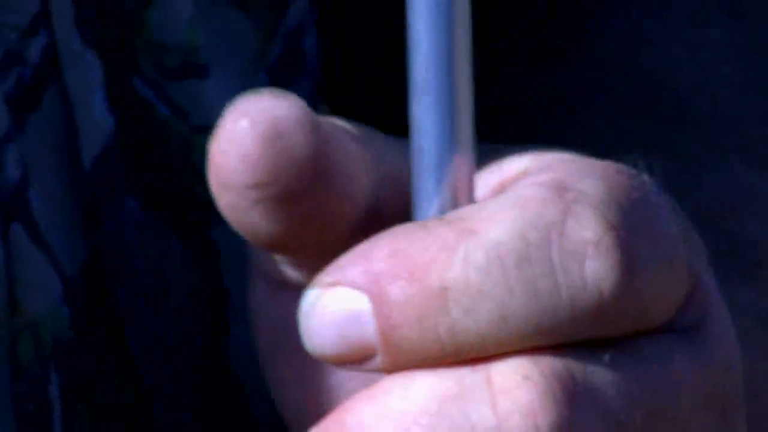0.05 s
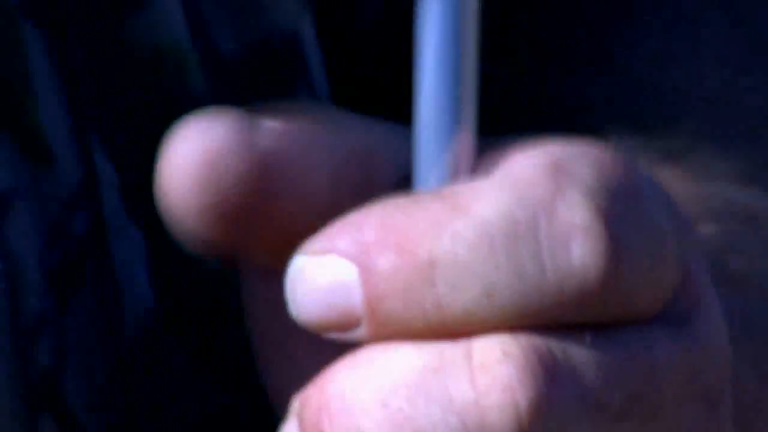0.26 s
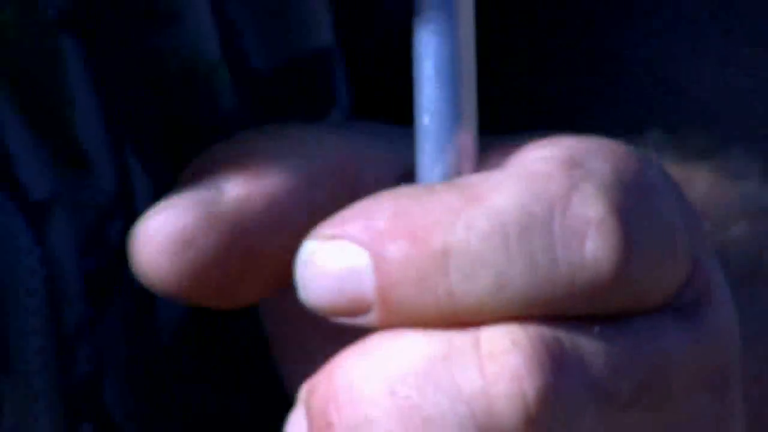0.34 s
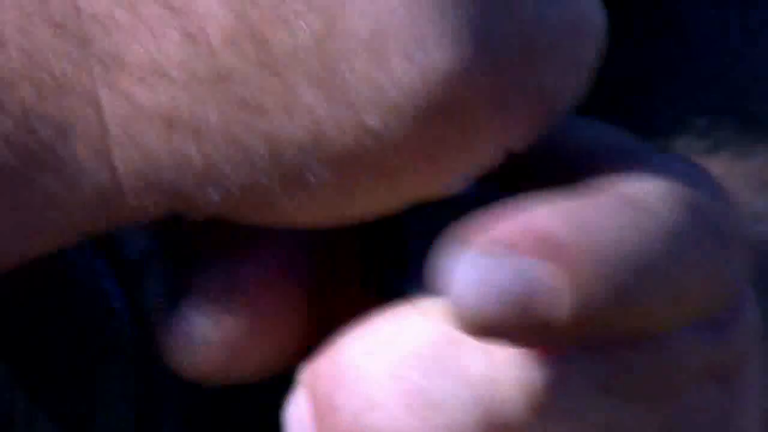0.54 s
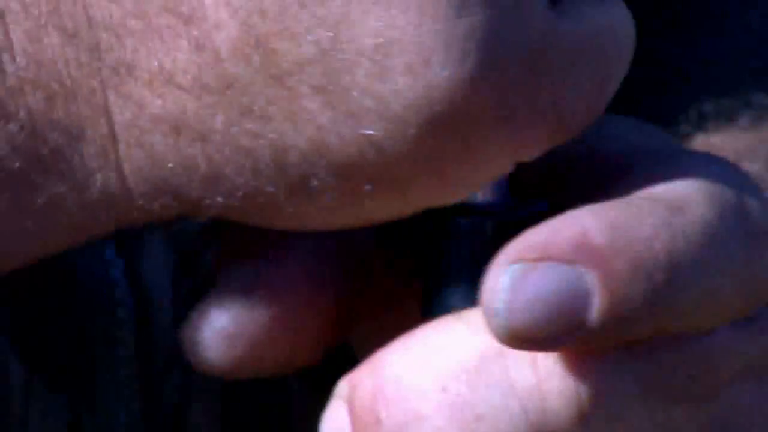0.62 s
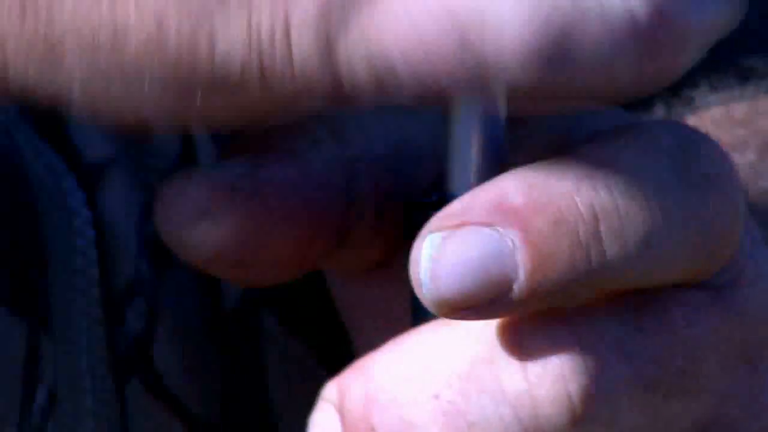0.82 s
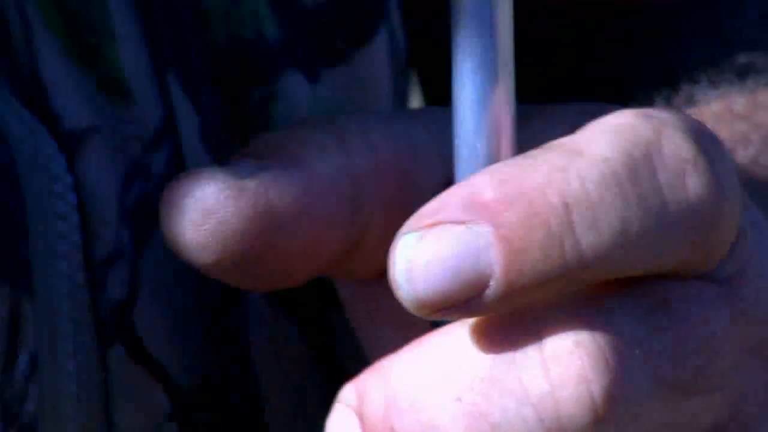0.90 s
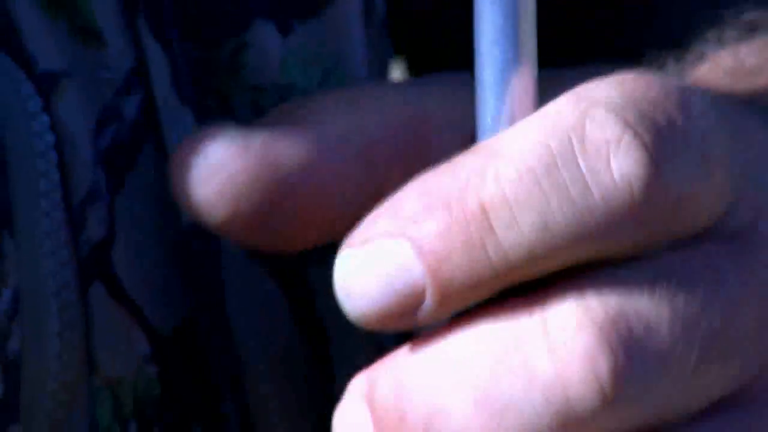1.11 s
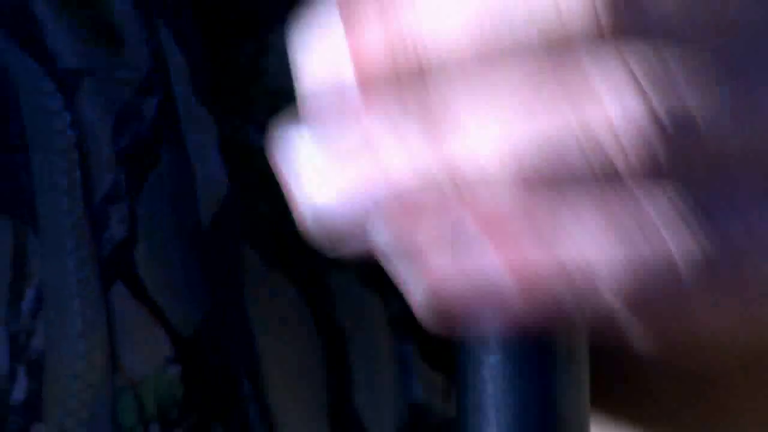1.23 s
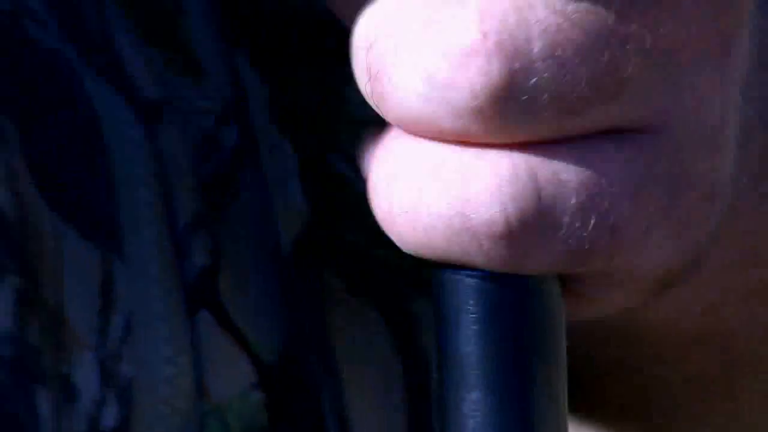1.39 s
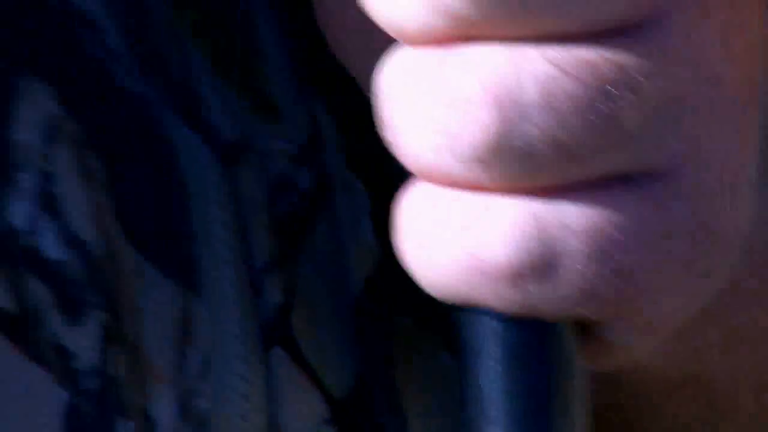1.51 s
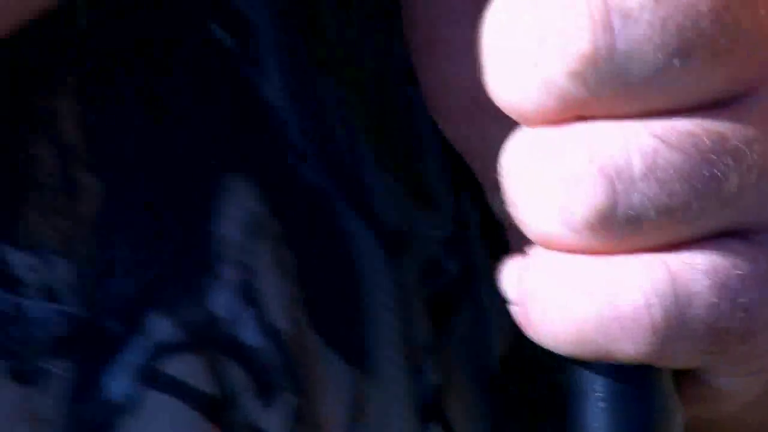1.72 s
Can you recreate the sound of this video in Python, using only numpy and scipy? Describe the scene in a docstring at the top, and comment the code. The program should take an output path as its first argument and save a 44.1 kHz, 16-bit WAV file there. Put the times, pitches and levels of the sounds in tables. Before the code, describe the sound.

A thin metal rod clicks, rattles and scrapes in a gun barrel close by, busiest from 0.2 to 0.7 seconds, then in lighter ticks until 1.3, with a few soft hand bumps. Further off, a bird holds a swelling whistle from about 0.7 to 1.2 seconds, while a smaller bird sings quick high slurs from 0.7 to 1.8. A faint outdoor hiss and low hum lie underneath.

```python
"""Over a faint hiss and low hum, a thin metal rod clicks on a gun's muzzle and scrapes along the bore,
close by and outdoors. Each touch rings the modes of rod and barrel; sliding is a dense run of tiny
slips. The hand bumps the barrel as it changes grip. Further off, one bird holds a pure, swelling
whistle while a smaller one sings quick high slurs, both scattered by trees and ground."""
import sys
import numpy as np
from scipy import signal
from scipy.fft import rfft, irfft
from scipy.io import wavfile
from scipy.ndimage import uniform_filter1d

SR = 44100
rng = np.random.default_rng(int(sys.argv[2]) if len(sys.argv) > 2 else 0)


def unload_audio(sound):
    """Save the sound as a 16-bit wav file, at the path given as the first command line argument."""
    columns = np.transpose(np.atleast_2d(sound))
    # keep every value between -1 and 1, then stretch to whole-number steps
    steps = np.round(np.clip(columns, -1, 1) * 32767)
    wavfile.write(sys.argv[1], SR, steps.astype(np.int16))


N = 77175
T = np.arange(N) / SR
STRIKE_T = T[:SR // 5]
CUTOFF_HZ = 16200


def from_db(db):
    """Decibels to gain."""
    return 10 ** (np.asarray(db) / 20)


def unit_rms(x):
    """Scale to rms 1."""
    return x / np.sqrt(np.mean(x ** 2) + 1e-20)


def db_at(spectrum, hz):
    """Interpolate (freq_hz, level_db) points on a log-frequency axis."""
    freq_hz, level_db = np.transpose(spectrum)
    return np.interp(np.log(hz), np.log(freq_hz), level_db)


def add(out, start_s, x):
    """Mix x into out from start_s on."""
    i = int(start_s * SR)
    out[i:i + len(x)] += x[:max(N - i, 0)]


def butter(x, kind, hz, order=2):
    """Butterworth filter."""
    return signal.sosfilt(signal.butter(order, hz, kind, fs=SR, output="sos"), x + 1e-18)


def ring(x, hz, t60_s):
    """Resonator: a unit click starts a dying sine of height 1."""
    r, w = from_db(-60 / (t60_s * SR)), 2 * np.pi * hz / SR
    return signal.lfilter([0, np.sin(w)], [1, -2 * r * np.cos(w), r * r], x + 1e-18)


def decay(t, t60_s):
    """Exponential decay from t = 0, silent before."""
    return (t >= 0) * np.exp(-np.log(1000) * np.maximum(t, 0) / t60_s)


# air noise spectrum: freq_hz, density_db
AIR_SPECTRUM = [(25, -13), (50, -12), (85, 0.5), (135, -7), (205, 0.5), (280, -12.5), (500, -12.5),
                (750, -11), (1100, -12.5), (1700, -14), (4000, -16.5), (8000, -19.5), (14000, -20),
                (15500, -31.5)]


def hiss_and_hum(hiss_db=-55, hum_db=-62.5, hum_hz=206.1, hum_width_hz=4.7):
    """Steady broad hiss; a narrow band of noise makes the wavering hum."""
    hz = np.maximum(np.fft.rfftfreq(N, 1 / SR), 1)
    hiss = irfft(rfft(rng.standard_normal(N)) * from_db(db_at(AIR_SPECTRUM, hz)), N)
    hum_t60_s = np.log(1000) / (np.pi * hum_width_hz)
    hum = ring(rng.standard_normal(2 * N), hum_hz, hum_t60_s)[N:]
    return from_db(hiss_db) * unit_rms(hiss) + from_db(hum_db) * unit_rms(hum)


def slips(n, rate_per_s, spread_db):
    """Friction: impulses of random time, sign and size."""
    impulses = (rng.random(n) < rate_per_s / SR) * rng.choice([-1, 1], n)
    return impulses * from_db(spread_db * rng.standard_normal(n))


# modes of rod and barrel, rung by every touch: freq_hz, level_db, t60_s
METAL_MODES = [(415.9, -25.5, 0.14), (735, -15, 0.074), (981, -19.5, 0.07), (1046.3, -12, 0.062),
               (1329, -15, 0.064), (1412, -18.5, 0.057), (1896, -13.5, 0.039), (2196, -9.5, 0.058),
               (2465, -13, 0.049), (2678, -15, 0.045), (2900, -16, 0.077), (3240, -21, 0.017),
               (3424, -14, 0.021), (3814, -13.5, 0.027), (4525, -10.5, 0.04), (5160, -30, 0.022),
               (5880, -12, 0.028), (6460, -17, 0.027), (7880, -17, 0.024), (9660, -15.5, 0.013),
               (11320, -22, 0.046), (12240, -27, 0.024)]
# rod brushing the muzzle: time_s, level_db
RUB_LEVELS = [(0.0, -76), (0.08, -54.5), (0.13, -90), (0.55, -57), (0.70, -58), (0.80, -60.5),
              (0.92, -62.5), (1.05, -58.5), (1.15, -57), (1.30, -54.5), (1.42, -74)]


def rod_rub():
    """Sparse soft slips keep the low modes faintly ringing while the rod moves."""
    friction = slips(N, rate_per_s=180, spread_db=4)
    metal = sum(from_db(db) * ring(friction, hz, t60_s) for hz, db, t60_s in METAL_MODES)
    level_db = np.interp(T, *np.transpose(RUB_LEVELS))
    return from_db(level_db) * unit_rms(butter(metal, "low", hz=1380))


def bending_lag_s(hz):
    """Bending waves disperse: low frequencies trail the treble."""
    return 0.002385 * (np.sqrt(1000 / hz) - np.sqrt(1000 / CUTOFF_HZ))


def struck_mode(hz, db, t60_s):
    """A dying sine that arrives with its bending wave."""
    t = STRIKE_T - bending_lag_s(hz)
    return from_db(db) * np.sin(2 * np.pi * hz * t) * decay(t, t60_s)


def crowded_modes(envelope, low_hz, high_hz):
    """Dense modes blur into a band of noise, with the energy of the envelope."""
    noise = butter(rng.standard_normal(len(envelope)) * envelope, "band", [low_hz, high_hz])
    return unit_rms(noise) * np.sqrt(np.mean(envelope ** 2))


# spectrum of a touch's crowded modes: freq_hz, density_db
CONTACT_SPECTRUM = [(150, -32), (330, -22), (600, -13), (1000, -9), (1650, -2.5), (2500, 1.5), (3500, 4.5),
                    (4700, 1.5), (7000, -12), (8700, -22.5), (11000, -9.5), (15000, -13.5)]


def contact(bass_db, treble_db, crowd_db=0.5, tail_db=-18.5, mode_spread_db=2.5):
    """Metal touches metal: crowded modes, quickly damped by the hand, and the clear ones."""
    edges_hz = np.geomspace(130, 16000, 17)
    centres_hz = np.sqrt(edges_hz[1:] * edges_hz[:-1])
    tone = [(1720, bass_db), (1980, 0), (11800, treble_db)]
    gains = from_db(db_at(CONTACT_SPECTRUM, centres_hz)) * np.sqrt(np.diff(edges_hz))
    gains = gains / np.linalg.norm(gains) * from_db(crowd_db + db_at(tone, centres_hz))
    out = np.zeros(len(STRIKE_T))
    for low_hz, high_hz, hz, gain in zip(edges_hz, edges_hz[1:], centres_hz, gains):
        t = STRIKE_T - bending_lag_s(hz)
        attack_s = 0.00034 * np.sqrt(2000 / hz)  # the tip chatters as it lands
        t60_s = 0.025 * (2000 / hz) ** 0.46
        rise = np.clip(t / attack_s, 0, 1)
        fall = decay(t, t60_s) + from_db(tail_db) * decay(t, t60_s=0.1)
        out += gain * crowded_modes(rise * fall, low_hz, high_hz)
    for hz, db, t60_s in METAL_MODES:
        mode_db = db + db_at(tone, hz) + mode_spread_db * rng.standard_normal()
        out += struck_mode(hz, mode_db, t60_s)
    return out


# rod striking the barrel: start_s, level_db, bass_db, treble_db, knock_hz, ping_hz
ROD_STRIKES = [(0.020, -46, -1.5, -12, 1076, 2220), (0.181, -40, 0, -21, 1080, 2220),
               (0.1979, -36, -5, -9, 1090, 2020), (0.2211, -22.5, 6, 8.5, 1315, 2500),
               (0.2419, -24.5, -3, 0.5, 1040, 2190), (0.2778, -21, 1.5, 4, 973, 3380),
               (0.3304, -20, 5.5, 7.5, 1037, 2560), (0.3362, -25.5, -1.5, 11.5, 790, 9650),
               (0.3392, -22, -5.5, -17, 1010, 3850), (0.3778, -33, 3.5, -4, 816, 2130),
               (0.4236, -34, 9.5, 10, 1010, 3820), (0.4873, -39.5, 4, 1, 1080, 2070),
               (0.5011, -32, 4.5, 2.5, 1020, 3460), (0.5135, -30, 1, 3, 1030, 2900),
               (0.5303, -22, 3, 2, 772, 11050), (0.5346, -16, -3, 9, 773, 2160),
               (0.5365, -20.5, -12, -14, 598, 2150), (0.555, -41, 4, 10, 1010, 11300),
               (0.5827, -29, -3, 2.5, 1022, 4670), (0.596, -38, -7, 7.5, 1000, 2220),
               (0.6015, -33.5, -2.5, -7, 1720, 2100), (0.6593, -30.5, -3.5, -6.5, 690, 2100),
               (0.677, -38, -0.5, -13, 1007, 4500), (0.8455, -33, -4.5, -42, 1580, 1850),
               (0.967, -41.5, 5, 9.5, 1025, 9650), (1.1166, -34.5, -1, -6, 1097, 2880),
               (1.1481, -35.5, -9, -11.5, 1620, 2950), (1.162, -33.5, -2, -33, 1866, 1970),
               (1.171, -38.5, 3.5, 9.5, 770, 3920), (1.215, -42.5, -7, -9, 760, 2970),
               (1.2771, -47, -8, -3, 584, 3830), (1.2973, -38, 1, -11, 506, 2036)]


def rod_clicks(crack_db=8):
    """Each strike hits a new spot: a sharp crack, its own mix of modes, a hollow knock, a bright ping."""
    out = np.zeros(N)
    impulse = butter(signal.unit_impulse(len(STRIKE_T)), "band", hz=[1500, CUTOFF_HZ])
    for start_s, level_db, bass_db, treble_db, knock_hz, ping_hz in ROD_STRIKES:
        crack = from_db(crack_db + treble_db) * impulse
        knock = struck_mode(knock_hz, db=-5.5, t60_s=0.037)
        ping = struck_mode(ping_hz, db=-1, t60_s=0.024)
        add(out, start_s, from_db(level_db) * (crack + contact(bass_db, treble_db) + knock + ping))
    return out


# rod sliding along the bore: start_s, length_s, level_db, squeak_hz
ROD_SLIDES = [(0.204, 0.013, -31.5, 4450), (0.231, 0.015, -29.5, 2170), (0.2437, 0.01, -25, 4240),
              (0.251, 0.00995, -22.5, 3120), (0.282, 0.04, -41, 1080), (0.318, 0.0046, -31.5, 3800),
              (0.3672, 0.0055, -33.5, 2570), (0.508, 0.043, -30.5, 2780), (0.579, 0.038, -36, 2165)]


def rod_scrapes(squeak_db=-3.5):
    """A dense run of tiny slips rings the metal; one squeaky resonance stands out."""
    out, t = np.zeros(N), T[:SR // 10]
    for start_s, length_s, level_db, squeak_hz in ROD_SLIDES:
        progress = np.minimum(t / length_s, 1)
        stroke = np.sqrt(np.maximum(np.sin(np.pi * progress), 0))
        friction = stroke * slips(len(t), rate_per_s=750, spread_db=5.5)
        metal = signal.fftconvolve(friction, contact(bass_db=-0.5, treble_db=-0.5))
        squeak = ring(metal, squeak_hz, t60_s=0.0077)
        scrape = unit_rms(metal) + from_db(squeak_db) * unit_rms(squeak)
        scrape *= np.linalg.norm(stroke) / (np.linalg.norm(scrape) + 1e-12)
        add(out, start_s, from_db(level_db) * scrape)
    return butter(out, "band", hz=[500, CUTOFF_HZ])  # slips too light to stir the lowest mode


def thin_metal(x):
    """A thin rod radiates no deep bass and little at the very top."""
    no_bass = butter(x, "high", hz=294, order=4)
    return butter(no_bass, "low", hz=13440, order=8)


# hand meeting the barrel: start_s, level_db, pitch_hz
HAND_BUMPS = [(0.521, -41, 245), (0.632, -47, 202), (1.096, -46.5, 177), (1.279, -42, 328),
              (1.297, -44.5, 450)]


def hand_bumps(rise_s=0.0021, band_ratio=1.4):
    """Soft, dull knocks of the hand on the barrel."""
    out = np.zeros(N)
    envelope = 2 * (1 - np.exp(-STRIKE_T / rise_s)) * decay(STRIKE_T, t60_s=0.062)
    for start_s, level_db, pitch_hz in HAND_BUMPS:
        bump = crowded_modes(envelope, pitch_hz / band_ratio, pitch_hz * band_ratio)
        add(out, start_s, from_db(level_db) * bump)
    return out


def glide(pitch_hz):
    """Unit-rms sine following a pitch curve."""
    return np.sqrt(2) * np.sin(2 * np.pi * np.cumsum(pitch_hz) / SR)


def sing(curve, start_s=0):
    """A pure tone along (time_s, pitch_hz, level_db) points, smoothed over 5 ms."""
    time_s, pitch_hz, level_db = np.transpose(curve)
    t, window = T - start_s, SR // 200
    gate = (t > time_s[0]) * (t < time_s[-1])
    gain = uniform_filter1d(gate * from_db(np.interp(t, time_s, level_db)), window)
    return gain * glide(uniform_filter1d(np.interp(t, time_s, pitch_hz), window))


def scatter(x, t60_s):
    """Diffuse reflections from trees and ground."""
    tail = rng.standard_normal(N) * decay(T, t60_s)
    return signal.fftconvolve(x, tail / np.linalg.norm(tail))[:N]


# held whistle: time_s, pitch_hz, level_db
WHISTLE_CURVE = [(0.66, 2100, -64), (0.75, 2145, -54), (0.80, 2190, -47), (0.83, 2200, -41),
                 (0.90, 2218, -37), (0.94, 2255, -33), (0.98, 2272, -27), (1.035, 2274, -24),
                 (1.08, 2275, -25), (1.125, 2292, -27), (1.15, 2275, -31), (1.18, 2260, -41),
                 (1.205, 2200, -56)]


def whistling_bird(echo_s=0.125, echo_db=-27, tail_db=-32.5):
    """One held note that rises as it swells, with an echo and a long faint tail."""
    note = sing(WHISTLE_CURVE)
    out = note + from_db(tail_db) * scatter(note, t60_s=1.7)
    add(out, echo_s, from_db(echo_db) * note)
    return out


# quick slurs: start_s, length_s, start_hz, middle_hz, end_hz, level_db
QUICK_SLURS = [(0.668, 0.070, 5050, 4150, 3260, -44.5), (0.789, 0.083, 5060, 4240, 3170, -42.5),
               (0.913, 0.011, 4540, 4790, 5670, -50), (1.262, 0.016, 3600, 4340, 4600, -50),
               (1.28, 0.038, 2930, 4090, 4800, -46.5), (1.289, 0.027, 2605, 3100, 2720, -50),
               (1.312, 0.03, 4480, 4840, 5870, -45), (1.345, 0.034, 5700, 4450, 4300, -48),
               (1.357, 0.084, 2650, 3870, 4590, -40.5), (1.541, 0.082, 7610, 4940, 3864, -37.5),
               (1.621, 0.056, 5450, 4800, 4520, -39.5)]
# long falling slur: time_s, pitch_hz, level_db
LONG_SLUR_CURVE = [(0.94, 6600, -66), (0.955, 5900, -51), (0.975, 5150, -47.5), (0.995, 5500, -44),
                   (1.01, 5350, -39.5), (1.025, 4950, -40.5), (1.07, 4170, -42), (1.11, 3600, -43),
                   (1.155, 3050, -57)]
# zigzag call: offset_s, pitch_hz, level_db
ZIGZAG_CURVE = [(0, 6600, -64), (0.011, 8000, -56), (0.019, 4700, -59), (0.027, 3950, -53),
                (0.036, 4600, -48), (0.046, 6400, -41)]
# zigzag onsets: start_s
ZIGZAG_STARTS = [1.515, 1.718]


def small_bird(peak_fraction=0.83, tail_db=-11):
    """Quick slurs, each a pitch arc that swells and stops, among a long slur and two zigzags."""
    song = sing(LONG_SLUR_CURVE) + sum(sing(ZIGZAG_CURVE, start_s) for start_s in ZIGZAG_STARTS)
    for start_s, length_s, start_hz, middle_hz, end_hz, level_db in QUICK_SLURS:
        progress = np.linspace(0, 1, int(length_s * SR))
        arc = np.polyfit([0, 0.5, 1], np.log([start_hz, middle_hz, end_hz]), 2)
        pitch_hz = np.exp(np.polyval(arc, progress))
        swell = np.sin(np.pi / 2 * np.interp(progress, [0, peak_fraction, 1], [0, 1, 0]))
        add(song, start_s, from_db(level_db) * swell * glide(pitch_hz))
    return song + from_db(tail_db) * scatter(song, t60_s=0.11)


def scene():
    """Rod and hand close by, birds further off; mono."""
    rod = thin_metal(rod_clicks() + rod_scrapes() + rod_rub())
    return (rod + hand_bumps() + whistling_bird() + small_bird() + hiss_and_hum())[None]


def record(dry):
    """Steep low-pass, 60 dB down at CUTOFF_HZ."""
    return signal.sosfilt(signal.cheby2(14, 60, CUTOFF_HZ, fs=SR, output="sos"), dry)


dry = scene()
out = record(dry)
unload_audio(out)
```